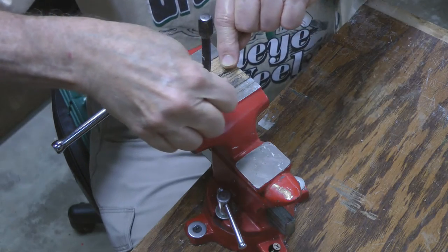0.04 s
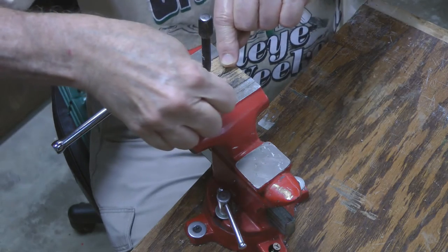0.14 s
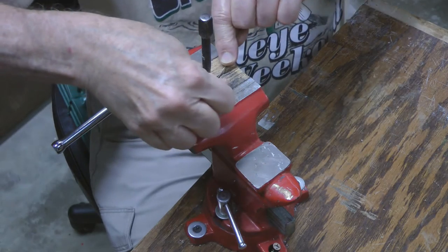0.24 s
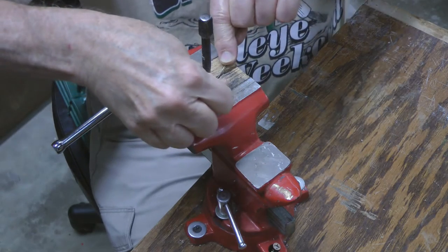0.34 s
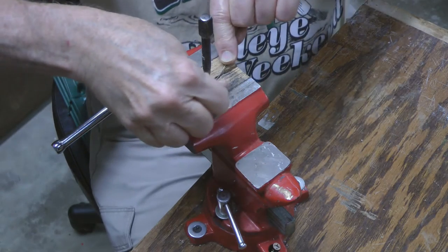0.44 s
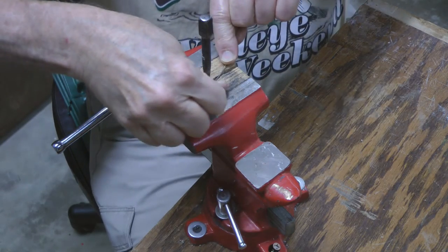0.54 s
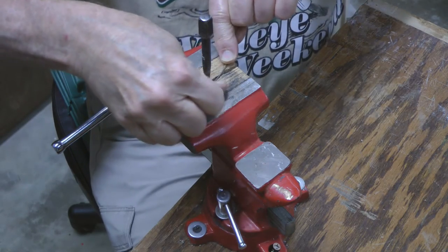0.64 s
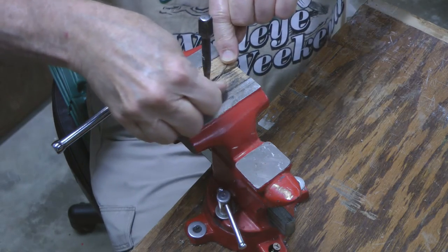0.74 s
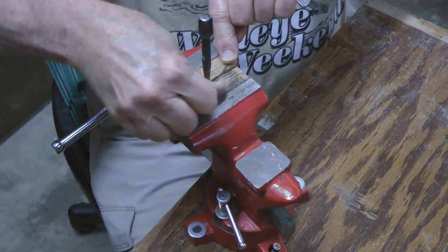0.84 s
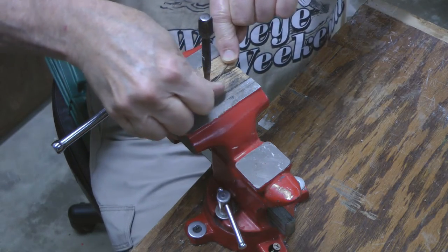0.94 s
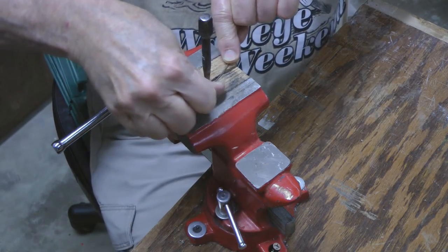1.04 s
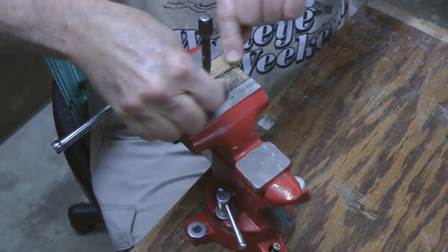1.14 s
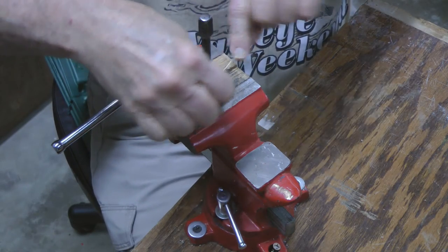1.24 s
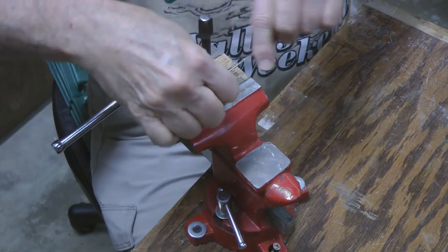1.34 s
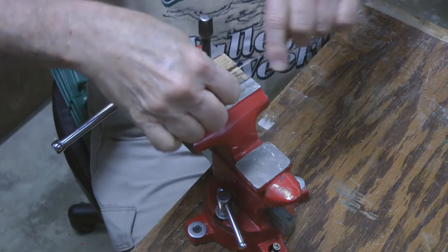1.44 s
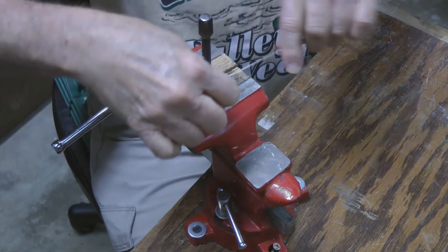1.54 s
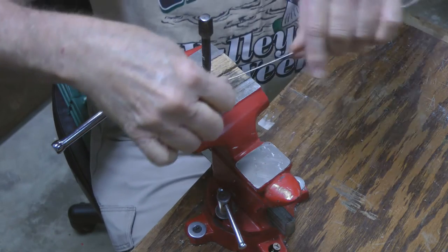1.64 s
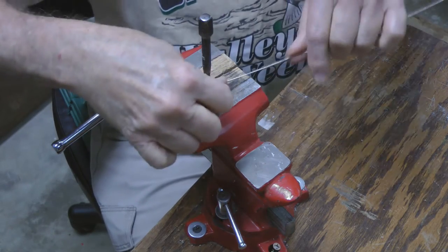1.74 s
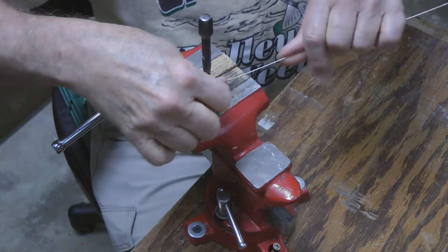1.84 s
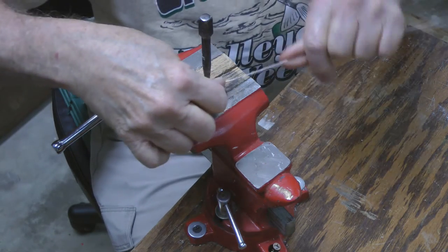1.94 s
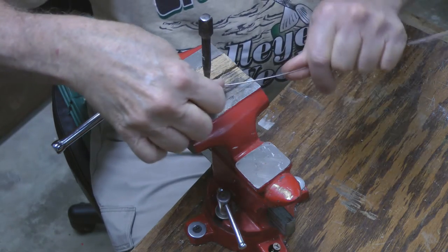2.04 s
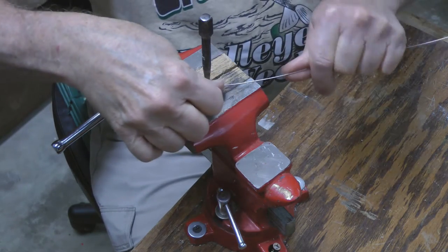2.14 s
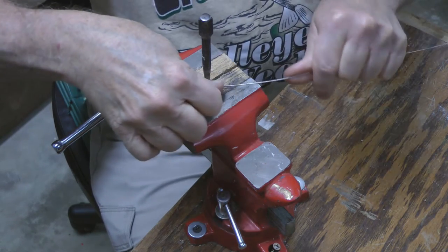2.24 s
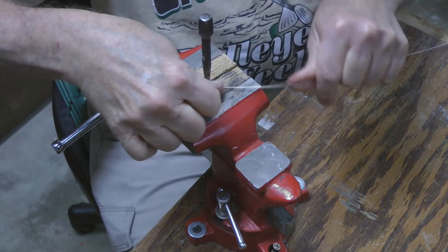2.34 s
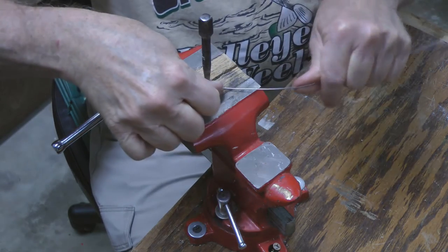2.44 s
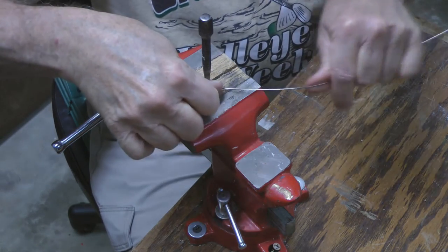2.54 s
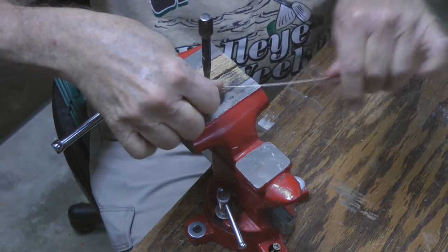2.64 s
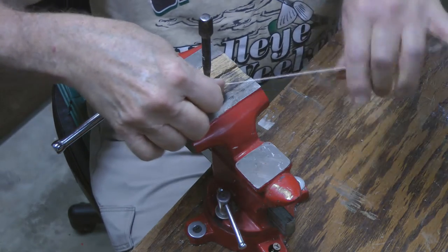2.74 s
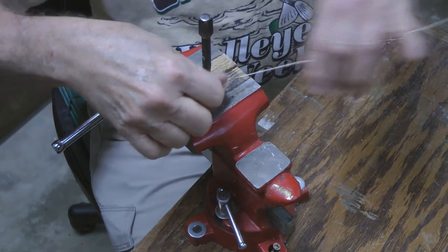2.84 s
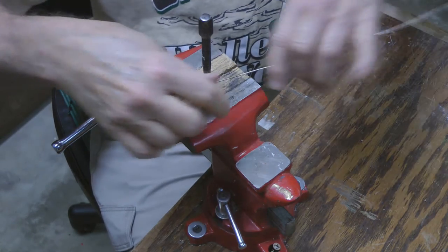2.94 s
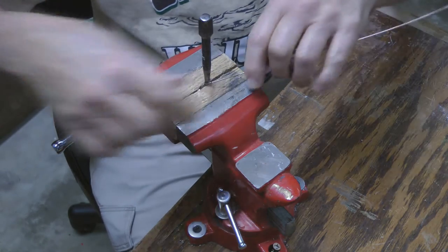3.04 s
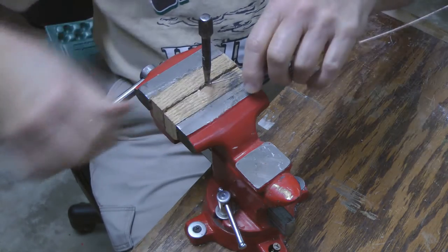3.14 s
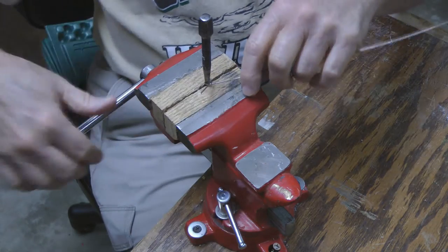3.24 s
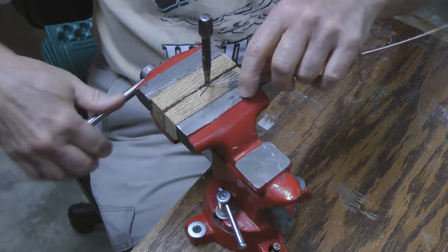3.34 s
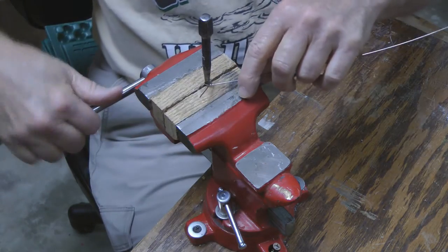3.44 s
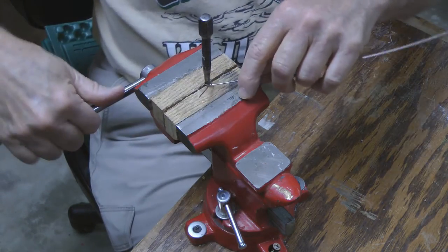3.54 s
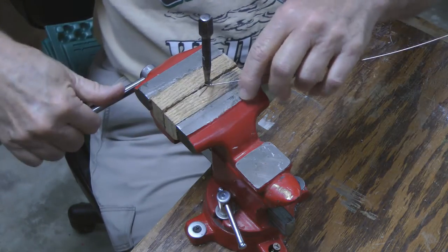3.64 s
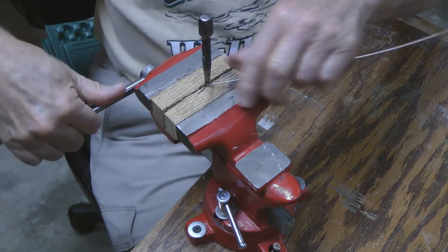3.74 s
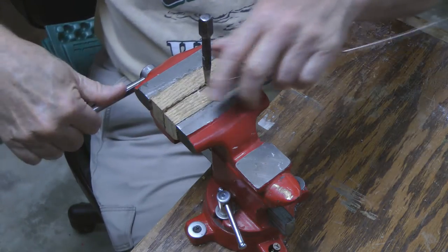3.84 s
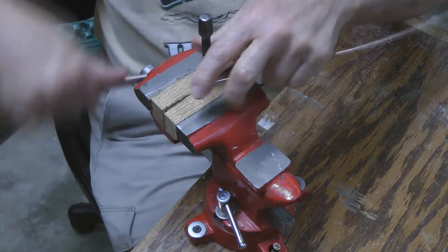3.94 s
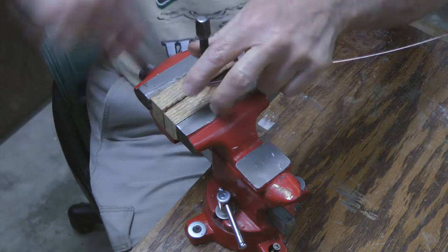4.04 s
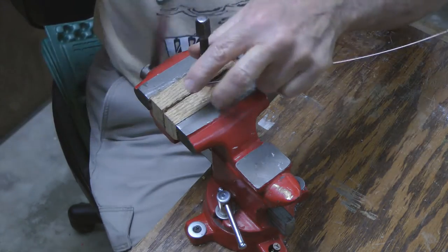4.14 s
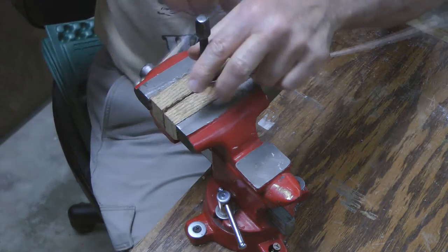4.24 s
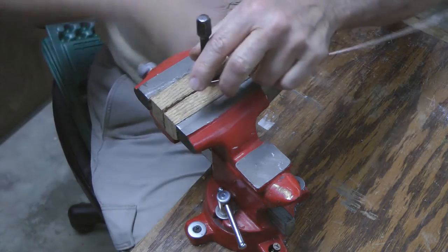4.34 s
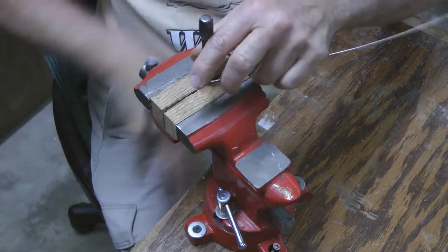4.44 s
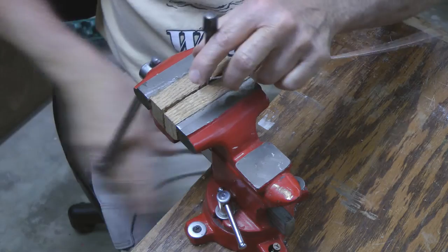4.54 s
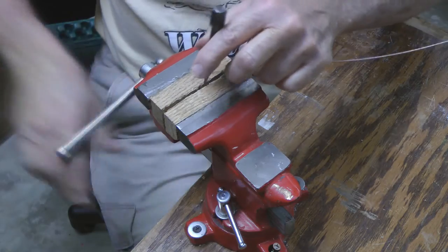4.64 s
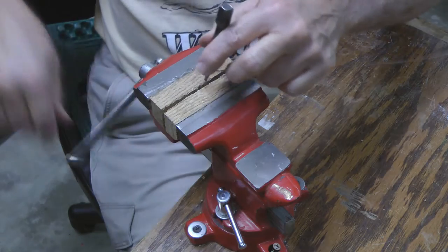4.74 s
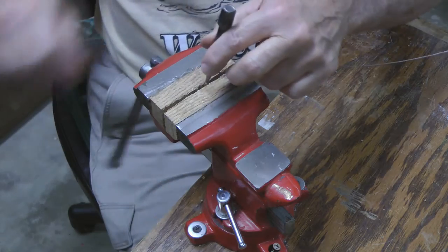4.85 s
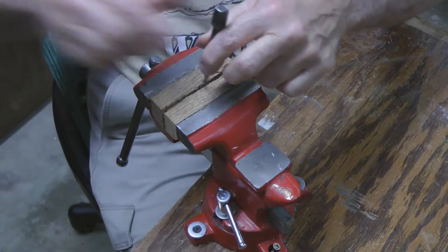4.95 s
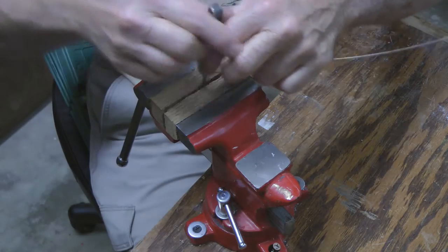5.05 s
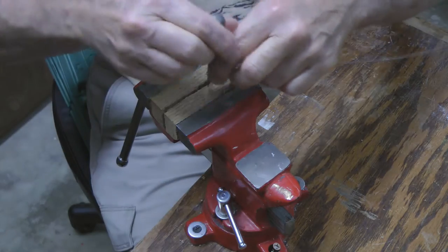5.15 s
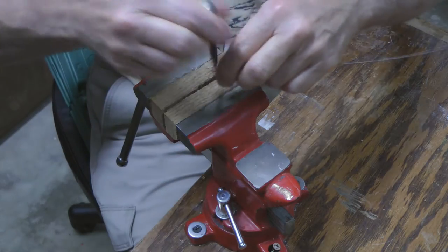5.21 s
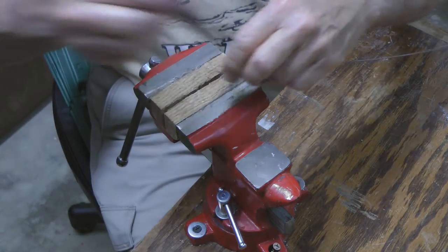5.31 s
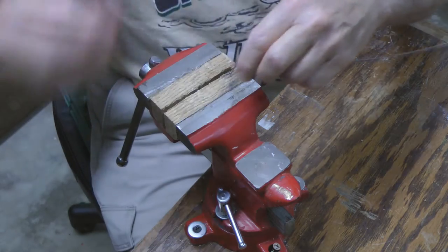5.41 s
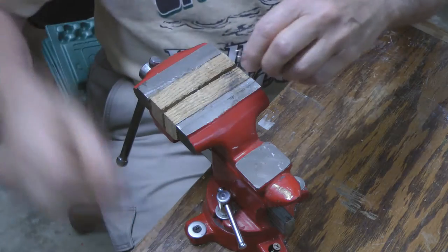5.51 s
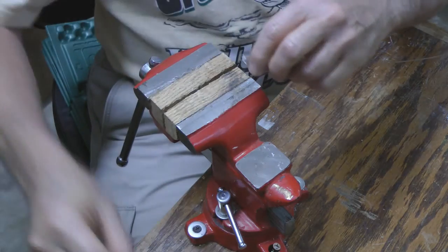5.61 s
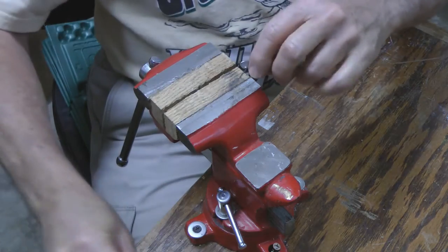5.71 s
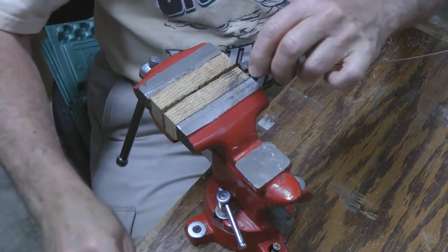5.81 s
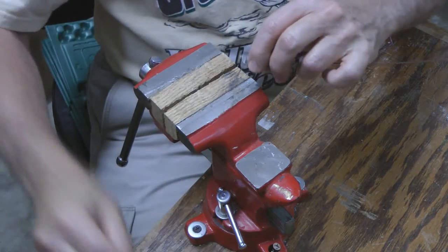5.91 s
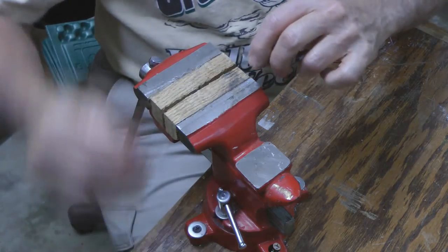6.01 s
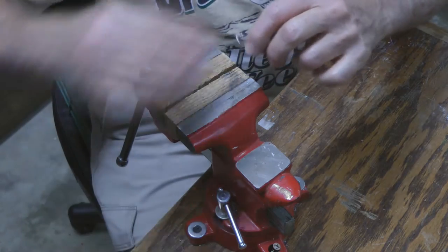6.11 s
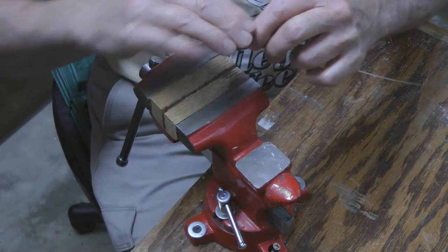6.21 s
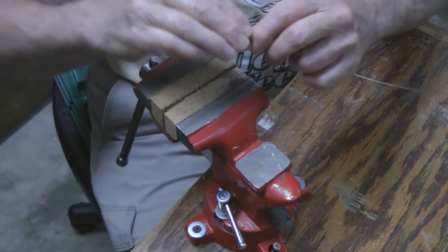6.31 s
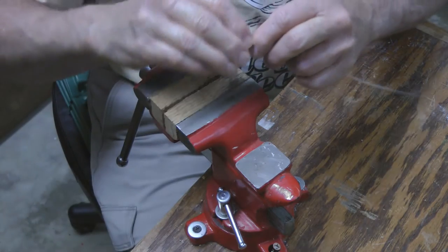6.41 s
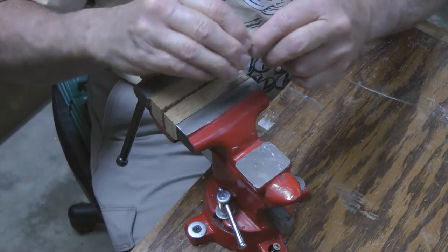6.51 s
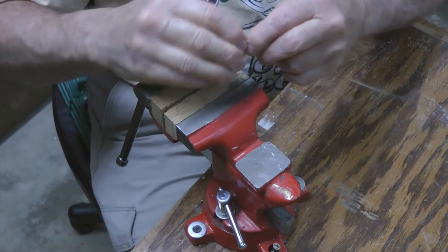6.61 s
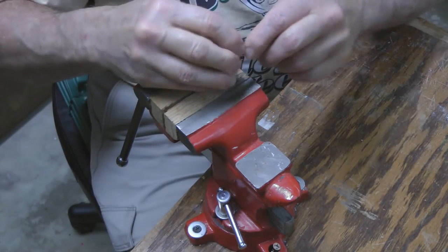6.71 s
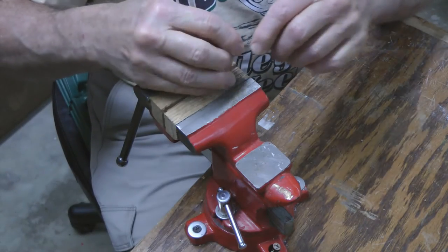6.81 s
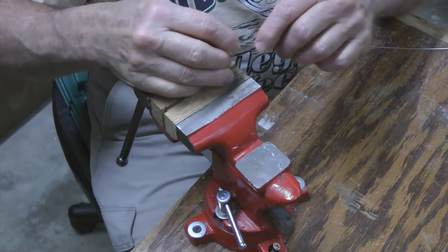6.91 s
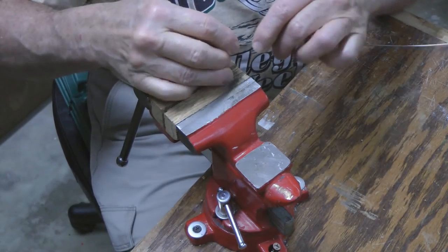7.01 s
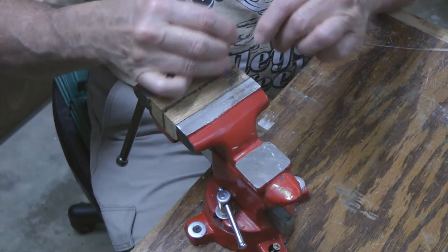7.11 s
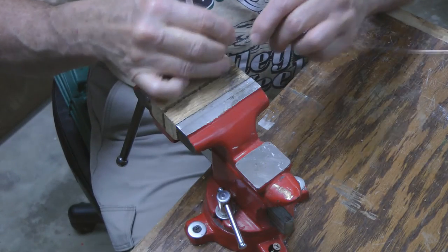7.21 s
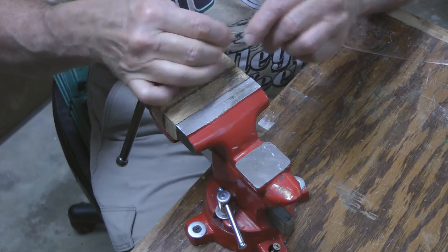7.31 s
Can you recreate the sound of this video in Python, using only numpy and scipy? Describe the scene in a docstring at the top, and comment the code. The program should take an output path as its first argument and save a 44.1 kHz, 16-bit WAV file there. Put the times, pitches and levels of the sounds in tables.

```python
"""A small, hard-walled workshop. Hands work a thin wire around a steel punch held in a bench vise,
then loosen the vise: the screw groans and the sliding handle clanks. The punch is pulled out and
dropped on the wooden bench, where it bounces, rattles and rings. Blows and stick-slip friction drive
the modes of vise, bench and punch. The room answers every hit, a fan hums, and two close
microphones pick up jolts through the bench legs."""
import sys
import numpy as np
from scipy import signal
from scipy.fft import rfft, irfft
from scipy.io import wavfile

SR = 44100
rng = np.random.default_rng(int(sys.argv[2]) if len(sys.argv) > 2 else 0)


def wav_out(sig):
    """Save sig, one row per channel (or a flat mono array), as 16-bit PCM at SR to the path in sys.argv[1]."""
    wavfile.write(sys.argv[1], SR, np.round(np.clip(np.atleast_2d(sig).T, -1, 1) * 32767).astype(np.int16))


N = 325017

# Bench top and vise foot. Each row: frequency in Hz, gain in dB, T60 in seconds.
BENCH_MODES = [(147.8, 2.5, 0.067), (240, 12, 0.014), (320, -5.5, 0.18), (380, 2, 0.12), (442, -2.5, 0.048),
               (569, -4, 0.063), (785, 3.5, 0.031), (1057, 4.5, 0.0087), (1460, -8.5, 0.19),
               (1890, -7.5, 0.013), (1903, 10.5, 0.0077), (2160, 8, 0.0081), (2523, 10, 0.013),
               (2940, 7.5, 0.0067)]
# Vise casting and handle bar. Each row: frequency in Hz, gain in dB, T60 in seconds.
VISE_MODES = [(1043, -22, 0.23), (1432, 13, 0.057), (1690, -22, 0.053), (2330, 14.5, 0.016),
              (2820, 6, 0.024), (2940, -24, 0.039), (3410, 10.5, 0.0067), (5070, -38, .1),
              (5260, 12.5, 0.018), (5720, 21, 0.0092), (6120, 6.5, 0.015), (7030, 19, 0.013),
              (7130, 5, 0.028), (6965, 15.5, 0.013), (7330, 7, 0.022), (10230, 14.5, 0.032),
              (11000, 9, 0.016), (11250, 11.5, 0.017), (11700, 16.5, 0.0042)]


def undb(db):
    return 10 ** (np.asarray(db) / 20)


def unit_rms(x):
    return x / np.sqrt(np.mean(x ** 2))


def at_hz(hz, table):
    """Interpolate (Hz, value) rows on a log-frequency axis."""
    points_hz, values = np.transpose(table)
    return np.interp(np.log(hz), np.log(points_hz), values)


def envelope(rows):
    """Gain from (seconds, dB) rows, silent outside their span."""
    times_s, db = np.transpose(rows)
    return undb(np.interp(np.arange(N) / SR, times_s, db, left=-200, right=-200))


def strokes(starts_s, holds_s, levels_db, rise_db_s, fall_db_s):
    """Gain of gestures that reach their level at the start time, hold and die away."""
    t, gain = np.arange(N) / SR, 0
    for start, hold, db, rise in np.broadcast(starts_s, holds_s, levels_db, rise_db_s):
        before_s, after_s = np.maximum(start - t, 0), np.maximum(t - start - hold, 0)
        gain = gain + undb(db - abs(rise) * before_s - fall_db_s * after_s)
    return gain


def band(x, lo_hz, hi_hz, order=2):
    sos = signal.butter(order, [lo_hz, min(hi_hz, .45 * SR)], "band", fs=SR, output="sos")
    return signal.sosfilt(sos, x)


def ring(force, modes):
    """Drive decaying (Hz, dB, T60 seconds) modes with a force."""
    out = 0
    for hz, db, t60_s in modes:
        pole = np.exp(2j * np.pi * hz / SR - np.log(1000) / (t60_s * SR))
        out = out + undb(db) * signal.lfilter([1], [1, -pole], force).imag
    return out


def grains(size, rate_hz, scatter_db):
    """Random clicks, a few much stronger than the rest."""
    hit, sign, weight = rng.random((3, size))
    return (hit < rate_hz / SR) * np.sign(sign - .5) * undb(-scatter_db * np.log(weight))


def chatter(decay_s, size):
    """One blow, then weaker, dying micro-bounces."""
    force = np.clip(.19 * grains(size, 6000, .85), -.6, .6)
    force *= np.exp(-np.arange(size) / SR / decay_s)
    force[0] = 1
    return force


def add(out, start_s, x, peak_db):
    i = int(start_s * SR)
    x = x[:N - i]
    out[i:i + len(x)] += x * undb(peak_db) / np.max(np.abs(x))


def fan():
    """Steady air noise, partly alike on both sides, with narrow hums."""
    # Air spectrum. Each row: frequency in Hz, relative density in dB.
    spectrum = [(15, -47), (25, -20), (114, -4.5), (170, -5.5), (195, -5), (242, -4), (263, -10),
                (354, -5.5), (489, -18), (624, -15), (775, -19), (988, -31), (1790, -19.5), (4250, -25.5),
                (16000, -38.5)]
    # Stereo likeness of the air. Each row: frequency in Hz, left-right correlation.
    correlation = [(30, 0.067), (100, 0.67), (300, 0.32), (1500, 0.79), (5000, 0.78), (12000, 0.98)]
    # Fan hums. Each row: centre in Hz, width in Hz, level in dB.
    hums = [(58, 2.6, -87), (125.8, 3.8, -77.5), (364, 8.4, -75), (763, 4.8, -72)]
    hz = np.maximum(np.fft.rfftfreq(N, 1 / SR), 1)
    alike = at_hz(hz, correlation)
    noise = rfft(rng.standard_normal((2, N))) * undb(at_hz(hz, spectrum))
    mid, side = noise * np.sqrt([1 + alike, 1 - alike])
    air = unit_rms(irfft(np.array([mid + side, mid - side]), N)) * undb(-61.5)
    hum = sum(undb(db) * unit_rms(band(rng.standard_normal(N), f - width / 2, f + width / 2, order=1))
              for f, width, db in hums)
    return air + hum


def wire_ticks():
    """The wire snags and clicks, pinging the jaws and knocking the bench."""
    # Each row: start in seconds, click level in dB, centre in Hz, tone share 0-1, jaw ping in Hz,
    # ping and bench knock in dB re the click.
    ticks = [(0.3512, -40.5, 3000, 0.22, 2410, -1, -14), (0.626, -49.5, 3400, .3, 1980, -5.5, -15),
             (0.8617, -36, 3940, 0.89, 1420, -6, -14), (1.088, -53.5, 1390, .3, 1840, -8, -15),
             (1.2233, -49, 3250, .1, 1650, -8, -13), (1.368, -31, 7900, 1, 2580, -12, -35),
             (1.6443, -52, 2320, .3, 2157, 4.5, -19), (2.0373, -39, 14200, .3, 2330, -30, -36),
             (2.047, -38.5, 15600, .3, 1780, -28, -35), (2.124, -52, 3000, .2, 1374, 1.5, -21),
             (2.1573, -41, 3620, .3, 2350, -14, -25), (2.7683, -29.5, 5640, 0.44, 1670, -24, -13),
             (2.9324, -46.5, 3760, .4, 1800, -16, -18), (3.1482, -44.5, 8400, 0.81, 2540, -17, -23),
             (3.234, -43, 5940, .2, 2010, -13, -14), (5.295, -43, 5000, .1, 1710, -12, -5),
             (6.947, -42, 3600, .1, 1640, -16, -14), (7.1859, -25.5, 3580, .1, 2340, -29, -32),
             (7.1938, -30, 3780, .15, 2090, -14, -19), (7.2084, -21, 4560, .15, 2285, -18, -31),
             (7.222, -22.5, 3920, .1, 3300, -20, -24)]
    out = np.zeros(N)
    edge_ratio, ping_t60_s = 2 ** .7, .035
    for start_s, db, hz, tone_share, ping_hz, ping_db, knock_db in ticks:
        force = chatter(decay_s=.0048, size=SR // 4)
        click = unit_rms(band(force, hz / edge_ratio, hz * edge_ratio))
        tone = unit_rms(ring(force, [(hz, 0, .03)]))
        ping = ring(force, [(ping_hz, 0, ping_t60_s), (1.12 * ping_hz, -4, ping_t60_s)])
        add(out, start_s, click + tone_share * tone, db)
        add(out, start_s, ping, db + ping_db)
        add(out, start_s, ring(force, BENCH_MODES[:7]), db + knock_db)
    return out


def rubbing():
    """Friction of fingers, wire and cloth, with a hiss above and bench rumble below."""
    # Each row: start and hold in seconds, level in dB, rise in dB/s, hiss and rumble in dB re the level.
    rubs = [(.352, .002, -62.5, 3000, -25, -12), (0.596, 0.048, -71, 400, -12, 2),
            (0.862, .01, -55, 3000, -15, -0.5), (1.09, 0.32, -78, 1000, -7, 7),
            (1.37, 0.048, -58.5, 3000, -16, -2), (1.648, .002, -83, 2000, -20, -9),
            (1.884, .002, -61.5, 700, -13, -0.5), (2.13, .06, -64.5, 1500, -12, 4.5),
            (2.287, 0.021, -60.5, 700, -12.5, 0), (2.408, 0.02, -65, 500, -10, 4.5),
            (2.62, .02, -70.5, 300, -10, -15), (2.779, 0.011, -47.5, 674, -32, -1.5),
            (3.016, .002, -65.5, 300, -10, -4), (3.182, 0.32, -73, 400, -9, 0),
            (3.575, .002, -53, 404, -16, 8), (3.798, 0.015, -71, 500, 1, -11),
            (4.058, 0.062, -63.5, 294, -34, 0.5), (6.59, 0.009, -66.5, 1000, -18, 8),
            (6.626, 0.018, -60, 1000, -12, -1.5), (6.852, 0.092, -72, 300, -7, 0),
            (7.018, 0.027, -65, 298, -10, 3), (7.188, 0.018, -49.5, 3000, -6, -14)]
    # Friction peaks. Each row: centre in Hz, width in Hz, gain in dB.
    peaks = [(1675, 19, 1.5), (2020, 180, -3), (2354, 90, 0.5), (2685, 170, 1.5), (3240, 1170, 3.5),
             (4830, 1000, -3)]
    friction = grains(N, rate_hz=3700, scatter_db=1.27)
    rub = sum(undb(db) * unit_rms(band(friction, hz - width / 2, hz + width / 2, order=1))
              for hz, width, db in peaks)
    hiss = band(friction, 7900, .45 * SR)
    rumble = ring(friction, BENCH_MODES[:8])
    start_s, hold_s, db, rise_db_s, hiss_db, rumble_db = np.transpose(rubs)
    return sum(unit_rms(layer) * strokes(start_s, hold_s, db + offset_db, rise_db_s, fall_db_s=173)
               for layer, offset_db in [(rub, 0), (hiss, hiss_db), (rumble, rumble_db)])


def leg_thumps():
    """Jolts pass through the bench legs and shake each microphone at its own pitch."""
    # Each row: start in seconds, peak in dB.
    jolts = [(0.862, -59), (2.15, -58), (3.457, -51.5), (3.619, -51), (4.019, -60), (4.229, -43),
             (4.424, -42.5), (4.892, -46), (5.199, -71), (5.935, -58)]
    # Leg modes. Each row: frequency in Hz, gain in dB, T60 in seconds.
    leg_modes = [(39, -17, 0.233), (62, 32, 0.71)]
    out = np.zeros((2, N))
    push = np.append(np.hanning(SR // 150), np.zeros(SR // 2))
    for channel, detune in zip(out, (.96, 1.04)):
        thump = ring(push, [(hz * detune, db, t60_s) for hz, db, t60_s in leg_modes])
        for start_s, peak_db in jolts:
            add(channel, start_s, thump, peak_db)
    return out


def vise_screw():
    """Stick-slip: the grip squeaks, the screw shakes low bench modes, the bar sings one vise mode."""
    # Hand gripping the handle. Each row: time in seconds, level in dB.
    grip = [(3.23, -79), (3.252, -56), (3.296, -79), (3.38, -63), (3.476, -70), (3.5, -59)]
    # Screw slipping under load, bench shifting. Each row: start and hold in seconds, level in dB.
    slips = [(3.493, .002, -51.5), (3.551, 0.063, -36), (5.195, 0.025, -49.5), (7.209, 0.034, -54)]
    # Bar sliding through the screw head. Each row: start and hold in seconds, level in dB.
    slides = [(3.5, .002, -64), (3.587, .01, -57), (4.026, 0.016, -64.5), (4.452, .002, -43),
              (4.704, 0.048, -58), (5.014, 0.011, -56)]
    bench = ring(grains(N, rate_hz=300, scatter_db=1.46), BENCH_MODES[1:6])
    groan = band(bench, 176, 535, order=4)
    bar = ring(grains(N, rate_hz=1500, scatter_db=2.1), VISE_MODES[1:2])
    squeak = ring(grains(N, rate_hz=1500, scatter_db=5.2), [(1790, 0, .024)])
    return (unit_rms(squeak) * envelope(grip)
            + unit_rms(groan) * strokes(*np.transpose(slips), rise_db_s=698, fall_db_s=450)
            + unit_rms(bar) * strokes(*np.transpose(slides), rise_db_s=504, fall_db_s=166))


def handle_clanks():
    """The handle hits the screw head: a steel click, then bench, casting and bar ring."""
    # Each row: start in seconds, level in dB, chatter decay in seconds, bench thud in dB,
    # treble slope in dB/octave, accented bar ring in Hz, its lift in dB.
    clanks = [(4.12, -12, .028, 2, 0, 5710, 6.5), (4.2262, -7.5, 0.038, 0, 0, 6750, 8),
              (4.4239, -8, 0.045, -8, -4.5, 7300, 10), (4.455, -22.5, 0.015, 6, 4.5, 7150, -4),
              (4.7273, -28.5, 0.065, -2.5, -13, 3470, 2.5), (4.8606, -20.5, 0.036, -1, -9.5, 4800, 7),
              (4.8745, -11.5, 0.038, -3, 2, 7130, 14)]
    # Clank spectrum: band edges in Hz, and each band's peak in dB re the clank level.
    edges_hz = [90, 650, 1700, 2800, 4300, 5400, 6400, 7050, 8300, 8800, 13500]
    shares_db = [-16.5, -19, -18.5, -12.5, -16, -14, -20, -27.5, -50, -18.5]
    out = np.zeros(N)
    click_db, lift_octaves = -11.5, .11
    for start_s, db, decay_s, thud_db, slope_db_oct, accent_hz, lift_db in clanks:
        force = chatter(decay_s, size=SR // 2)
        # The bar sits differently each time, shifting and reweighting its modes.
        seating = rng.standard_normal((len(VISE_MODES), 2))
        modes = [(hz * (1 + .006 * shift), gain_db + 3 * weight, t60_s)
                 for (hz, gain_db, t60_s), (shift, weight) in zip(VISE_MODES, seating)]
        body = ring(force, modes) + undb(5.5) * ring(force, BENCH_MODES) + undb(34) * force
        click = band(chatter(decay_s=.0031, size=SR // 20), 1500, 6500)
        add(out, start_s, click, db + click_db + slope_db_oct)
        for lo_hz, hi_hz, share_db in zip(edges_hz, edges_hz[1:], shares_db):
            hz = np.sqrt(lo_hz * hi_hz)
            tilt_db = slope_db_oct * max(np.log2(hz / 2800), 0)
            accent_db = lift_db * np.exp(-(np.log2(hz / accent_hz) / lift_octaves) ** 2)
            peak_db = db + share_db + tilt_db + accent_db + thud_db * (lo_hz < edges_hz[2])
            add(out, start_s, band(body, lo_hz, hi_hz, order=3), peak_db)
    return out


def punch_pull(modes_hz):
    """The punch tilts and scrapes out of the wooden jaws, its ring damped by the hold."""
    # Each row: start and hold in seconds, ring level in dB, scrape level in dB.
    tugs = [(4.674, 0.0018, -61.5, -66), (5.224, 0.0015, -62, -61.5), (5.31, .003, -54, -76),
            (5.364, 0.014, -58, -53.5)]
    start_s, hold_s, ring_db, scrape_db = np.transpose(tugs)
    friction = grains(N, rate_hz=2700, scatter_db=2.9)
    damped_ring = unit_rms(ring(friction, [(modes_hz[0], 0, .05), (modes_hz[1], -2, .05)]))
    scrape = unit_rms(band(friction, 1670, 10200))
    return (damped_ring * strokes(start_s, hold_s, ring_db, rise_db_s=904, fall_db_s=610)
            + scrape * strokes(start_s, hold_s, scrape_db, rise_db_s=246, fall_db_s=220))


def wood_knock(force, top_hz):
    """The bench top under the punch, its low modes subdued."""
    wood = ring(force, BENCH_MODES[5:]) + undb(-11) * ring(force, BENCH_MODES[:5]) + undb(24) * force
    return band(wood, 238, top_hz, order=3)


def contact_crack(force):
    """The treble of the contact force, with one short ring."""
    return band(force + undb(-35) * ring(force, [(6200, 0, .017)]), 4030, 6760, order=3)


def punch_drop(modes_hz):
    """Hardened steel bounces on wood, rings and rocks to rest."""
    # Each row: start in seconds, knock in dB, chatter decay in seconds, knock's upper edge in Hz,
    # crack and bright edge in dB re the knock, low and high ring in dB.
    landings = [(5.841, -23, 0.035, 1790, -5.5, -12, -52.5, -47.5),
                (5.934, -11.5, 0.0053, 2820, -3, -16.5, -59, -36.5),
                (5.998, -27, 0.03, 2700, -5, -35, -56, -39), (6.112, -22, 0.011, 3130, -16, -33, -52, -41),
                (6.175, -21.5, 0.015, 2720, -22, -44, -47, -43.5)]
    # Free ring of the low and high mode: T60 in seconds.
    t60s_s = [1.6, .9]
    # Rocking rattle. Each row: time in seconds, level in dB.
    rocking = [(5.93, -47), (5.934, -18.5), (5.952, -33), (5.994, -33.5), (6.0, -28), (6.09, -37.5),
               (6.122, -31.5), (6.184, -35.5), (6.3, -56)]
    out = np.zeros(N)
    ends_s = [row[0] for row in landings[1:]] + [N / SR]
    for landing, end_s in zip(landings, ends_s):
        start_s, knock_db, decay_s, top_hz, crack_db, edge_db, *rings_db = landing
        force = chatter(decay_s, size=SR + SR // 2)
        edge = band(chatter(decay_s=.0033, size=SR // 20), 7000, 16000)
        add(out, start_s, wood_knock(force, top_hz), knock_db)
        add(out, start_s, contact_crack(force), knock_db + crack_db)
        add(out, start_s, edge, knock_db + edge_db)
        t = np.arange(len(force)) / SR
        gate = np.clip(np.minimum(end_s - start_s - t, t) / .003, 0, 1)  # next landing stops the ring
        for hz, t60_s, db in zip(modes_hz, t60s_s, rings_db):
            tone = np.sin(2 * np.pi * hz * t) * np.exp(-np.log(1000) * t / t60_s)
            add(out, start_s, tone * gate, db)
    taps = np.clip(grains(N, rate_hz=4000, scatter_db=5), -5, 5)
    rattle = unit_rms(wood_knock(taps, top_hz=4050)) + undb(-16) * unit_rms(contact_crack(taps))
    return out + rattle * envelope(rocking)


def room(x):
    """Direct sound plus dense stereo reflections that die faster in the treble."""
    # Room decay. Each row: frequency in Hz, T60 in seconds.
    decay = [(100, 0.51), (500, 0.43), (2000, 0.36), (6000, 0.28), (14000, 0.27)]
    # Stereo width. Each row: frequency in Hz, side level in dB re mid.
    width = [(60, -2.5), (250, -7.5), (1000, -4), (2500, -7), (6000, -9.5), (14000, -9.5)]
    wet_db, onset_s = -1.5, .0038
    t = np.arange(SR // 2) / SR
    noise, tails = rng.standard_normal((2, len(t))), 0
    for hz in 62.5 * 2 ** np.arange(9):
        fade = np.exp(-np.log(1000) * t / at_hz(hz, decay))
        mid_side_gain = undb([[0], [at_hz(hz, width)]])
        tails = tails + band(noise, hz / np.sqrt(2), hz * np.sqrt(2)) * fade * mid_side_gain
    tails = tails * np.clip(t / onset_s, 0, 1) / np.sqrt(np.sum(tails[0] ** 2))
    mid, side = (signal.fftconvolve(x, tail)[:N] * undb(wet_db) for tail in tails)
    return x + mid + side * np.array([[1], [-1]])


def scene():
    # Low and high mode of the steel punch in Hz.
    punch_hz = [4177, 9135]
    work = handle_clanks() + punch_drop(punch_hz) + punch_pull(punch_hz)
    work += vise_screw() + wire_ticks() + rubbing()
    work = band(work, 126, 19000, order=3)  # small objects radiate no deep bass
    return room(work) + leg_thumps() + fan()


def record(dry):
    """Steep low-pass at 15.9 kHz."""
    return signal.sosfilt(signal.ellip(10, .2, 80, 15900, fs=SR, output="sos"), dry)


dry = scene()
out = record(dry)
wav_out(out)
```